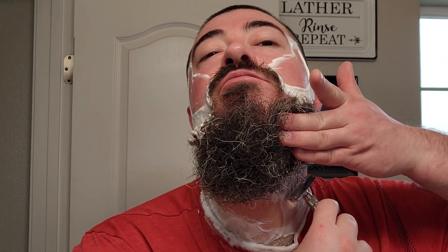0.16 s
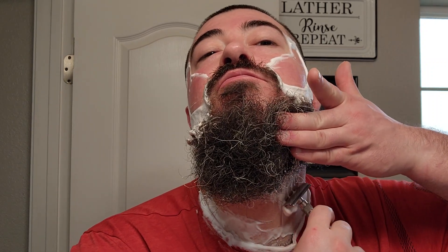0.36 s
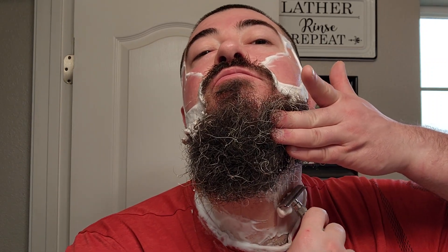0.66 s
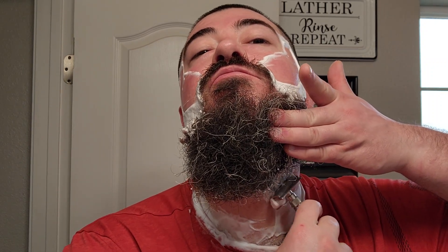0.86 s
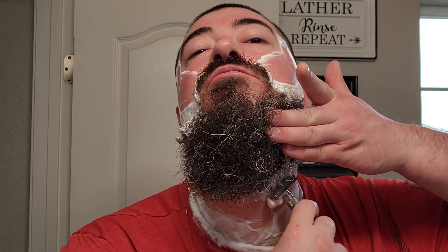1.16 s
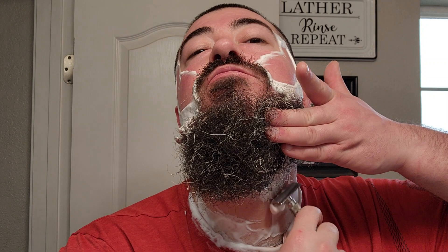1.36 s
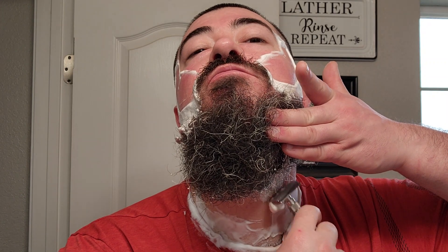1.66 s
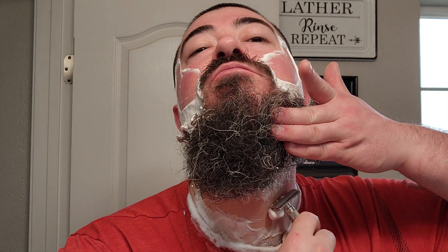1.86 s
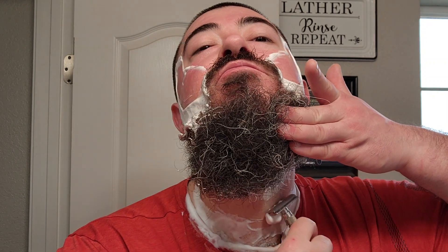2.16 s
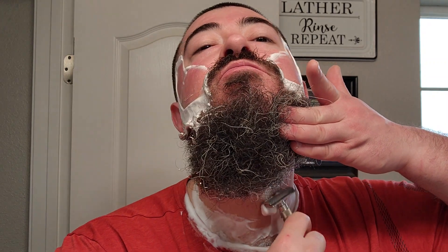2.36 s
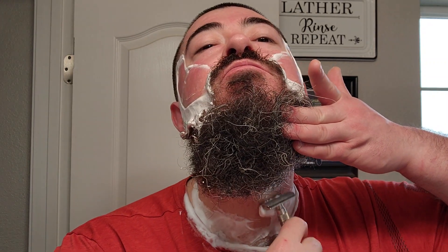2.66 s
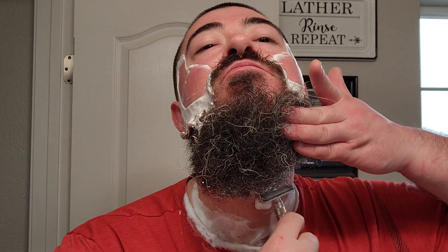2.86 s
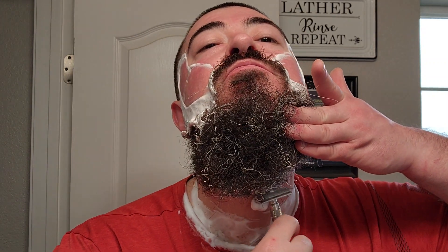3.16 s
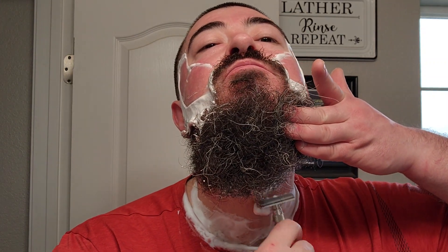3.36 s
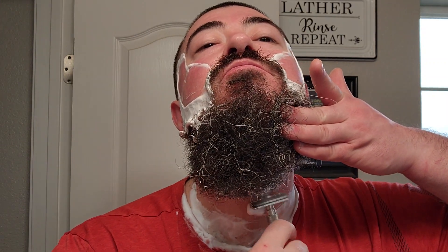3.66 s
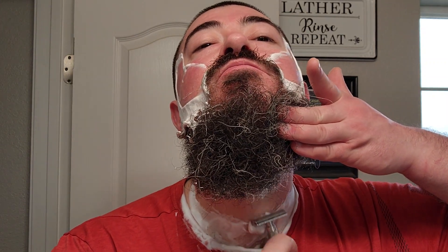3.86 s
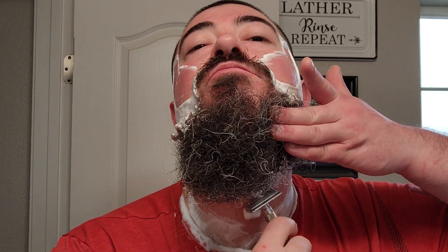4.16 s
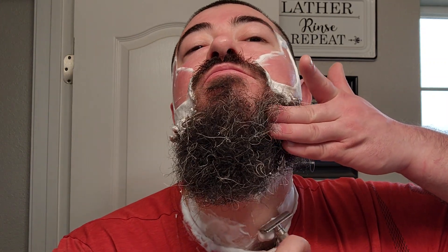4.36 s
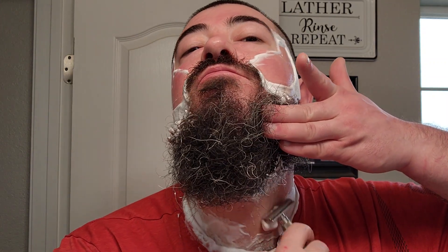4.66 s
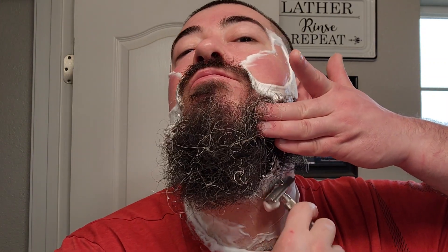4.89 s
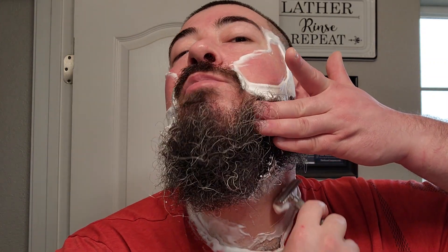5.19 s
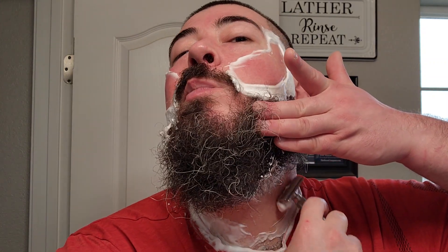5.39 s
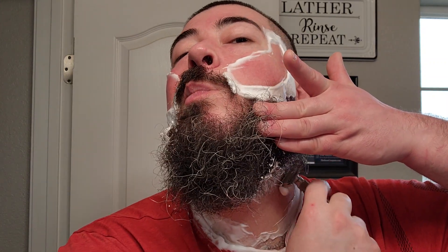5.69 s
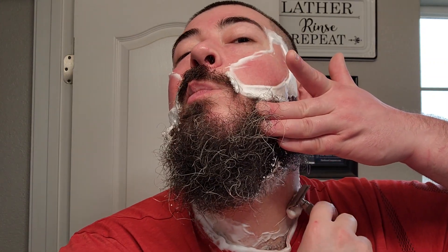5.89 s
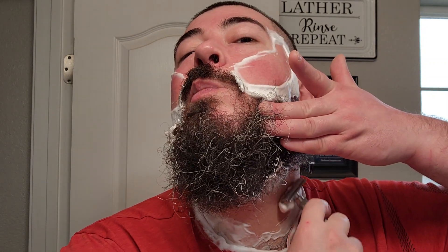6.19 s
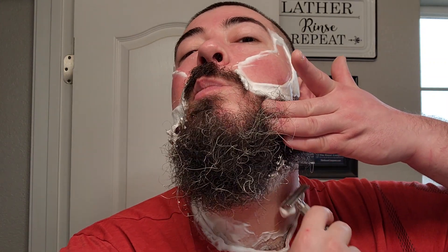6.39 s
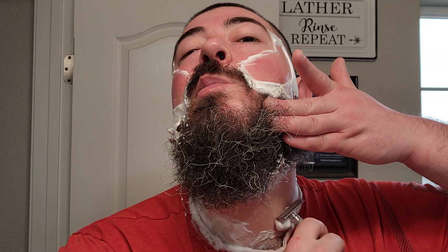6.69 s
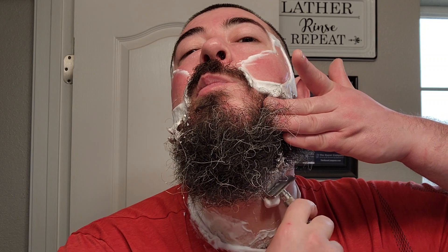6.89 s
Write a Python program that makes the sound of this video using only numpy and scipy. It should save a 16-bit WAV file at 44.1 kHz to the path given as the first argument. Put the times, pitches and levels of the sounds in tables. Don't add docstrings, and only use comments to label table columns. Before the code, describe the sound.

Close to a phone in a small tiled bathroom, a metal safety razor takes short, scratchy strokes through neck stubble and lather, about three per second. Each begins with a sudden bite and rasps for little more than a tenth of a second. Sharp hair snaps, faint blade ringing and fizzing bubbles stand out. A low fan hum, soft rumble and faint air hiss continue throughout.

```python
import sys
import numpy as np
from scipy import signal
from scipy.fft import rfft, irfft
from scipy.io import wavfile
from scipy.ndimage import uniform_filter1d

SR = 44100
rng = np.random.default_rng(int(sys.argv[2]) if len(sys.argv) > 2 else 0)


def master_out(mix):
    frames = np.transpose(np.atleast_2d(mix))
    ceiling = np.clip(frames, -1, 1)
    pcm = np.round(ceiling * 32767).astype(np.int16)
    wavfile.write(sys.argv[1], SR, pcm)


def invert_db(x):
    u = np.asarray(x, float) / 20
    return 10 ** u


N = 310464
BITE_RISE_S = 0.014

# freq_hz, width_hz, level_db
SKIN = [(1330, 260, -17), (2250, 360, -2.5), (2620, 250, -2.5), (3087, 470, -1)]
HEAD = [(3600, 890, -4.5), (4296, 490, -2), (4594, 570, -0.5), (5050, 330, -1), (5330, 660, -3.5)]
BLADE = [(6200, 540, -13), (7460, 700, 4), (7350, 570, -3.5), (8300, 1000, -6.5)]
FIZZ = [(9500, 5100, -6), (11930, 1400, -6), (15400, 2500, -4.5)]


def unit(x):
    return x / np.sqrt(np.mean(x ** 2))


def colour(x, points):
    hz, db = np.transpose(points)
    bins_hz = np.maximum(np.arange(N // 2 + 1) * SR / N, 1)
    gain_db = np.interp(np.log(bins_hz), np.log(hz), db)
    return irfft(rfft(x) * invert_db(gain_db), N)


def lag(x, samples):
    turns = np.arange(N // 2 + 1) / N * samples
    return irfft(rfft(x) * np.exp(-2j * np.pi * turns), N)


def ring(x, modes):
    out = 0
    for k, (hz, width_hz, db) in enumerate(modes):
        radius = np.exp(-np.pi * width_hz / SR)
        angle = 2 * np.pi * hz / SR
        b = [0, radius * np.sin(angle)]
        a = [1, -2 * radius * np.cos(angle), radius ** 2]
        out = out + (-1) ** k * invert_db(db) * np.sqrt(width_hz) * signal.lfilter(b, a, x)
    return out


def walk(rate_hz):
    hold = int(SR / rate_hz)
    steps = np.repeat(rng.standard_normal(N // hold + 1), hold)
    return unit(uniform_filter1d(uniform_filter1d(steps, hold), hold)[:N])


def clicks(per_s, spread_db):
    there = rng.random(N) < per_s / SR
    size = np.minimum(rng.exponential(size=N), 3.8)
    sign = rng.choice([-1., 1.], N)
    return there * sign * invert_db(spread_db * size)


def ticks(s, peak_db, modes):
    tick = np.zeros(N)
    tick[(s * SR).astype(int)] = invert_db(peak_db)
    rattle_s = 0.0012
    fading = signal.lfilter([0, 1], [1, -np.exp(-1 / (rattle_s * SR))], tick)
    tick = tick + 0.11 * fading * rng.standard_normal(N)
    peak = np.max(np.abs(ring(signal.unit_impulse(512), modes)))
    return ring(tick, modes) / peak


def air():
    # freq_hz, level_db
    rumble_points = [(12, -42), (20, -6), (54, -7), (102, -4), (123, -9.5), (146, -10), (167, -18),
                     (189, -26.5), (244, -18.5), (290, -31), (356, -26), (401, -35.5), (444, -30.5),
                     (574, -37.5), (1200, -60.5), (1560, -67), (2640, -120)]
    hiss_points = [(410, -28), (700, 1.5), (860, -9), (990, -6), (1440, -9), (1710, -10.5), (1970, -6),
                   (2530, -11), (3110, -8.5), (4150, -10.5), (4750, -6), (5500, -6.5), (6700, -12.5),
                   (7500, -7.5), (8300, -16.5), (8900, -29), (10000, -40.5), (15500, -30.5)]
    # freq_hz, width_hz, level_db
    booms = [(79.36, 3.2, -60.5), (154.8, 38, -64), (243.8, 3, -72.5), (335.8, 22, -74)]
    mid, side = (colour(rng.standard_normal(N), rumble_points) for _ in range(2))
    side = colour(side, [(30, -13.5), (120, -19.5), (300, -6.5), (700, -6.0), (1200, 2.0)])
    rumble_db, sway_db = -51, 0.6
    scale = invert_db(rumble_db + sway_db * walk(3.02)) / np.std(mid)
    mid, side = scale * mid, scale * side
    for hz, width_hz, db in booms:
        peak = [(hz - 3 * width_hz, -120), (hz - width_hz / 2, 0),
                (hz + width_hz / 2, 0), (hz + 3 * width_hz, -120)]
        boom = unit(colour(rng.standard_normal(N), peak))
        mid = mid + invert_db(db + 1.34 * walk(3.91)) * boom
    mid = colour(mid, [(95, 0.5), (110, -9), (135, -0.5)])
    hiss = np.array([unit(colour(rng.standard_normal(N), hiss_points)) for _ in range(2)])
    hiss_db = -73.5 + 0.5 * walk(2.2)
    return np.array([mid + side, lag(mid, 2.0) - side]) + hiss * invert_db(hiss_db)


def hum():
    # freq_hz, level_db (rms), unsteadiness_db, left_minus_right_db
    tones = [(98.3, -54.6, .6, .3), (120.0, -47.7, .25, .3), (240.1, -66.5, .9, .5),
             (360.0, -76.5, .9, 1.6), (436.1, -87, 1.4, 2.4), (960.3, -101, 1.5, -11)]
    late_samples = np.array([[0], [6.5]])
    t = (np.arange(N) - late_samples) / SR
    out = 0
    for hz, db, wobble_db, pan_db in tones:
        level = np.sqrt(2) * invert_db(db + wobble_db * walk(2.3))
        tone = level * np.sin(2 * np.pi * (hz * t + rng.random()))
        out = out + tone * invert_db(np.array([[pan_db], [-pan_db]]) / 2)
    return out


def bathroom(x, t60_s, wet_db):
    t = np.arange(int(.4 * SR)) / SR
    echoes = rng.standard_normal((2, len(t))) * invert_db(-60 * t / t60_s) * (t > .002)
    echoes = echoes / np.sqrt(np.sum(echoes ** 2, axis=1, keepdims=True))
    return invert_db(wet_db) * signal.fftconvolve(x[None], echoes, axes=1)[:, :N]


def singing():
    # start_s, length_s, pitch_hz, level_db (rms)
    notes_sung = [(0.123, 0.033, 2300, -76.5), (0.075, .07, 4310, -77), (0.395, 0.055, 4320, -76),
                  (0.426, 0.0378, 2230, -78), (1.567, 0.034, 2250, -73), (1.57, 0.03, 4640, -77),
                  (1.886, .04, 3000, -81), (2.752, 0.048, 5050, -88), (3.879, 0.047, 4770, -77),
                  (4.375, 0.042, 4560, -84), (4.756, 0.045, 3000, -76.5), (5.112, 0.052, 3036, -77),
                  (5.137, 0.03, 5330, -79.5), (6.325, 0.04, 2270, -77), (6.364, 0.044, 2270, -73),
                  (6.74, 0.048, 2236, -75.5)]
    out = np.zeros(N)
    for start_s, length_s, hz, db in notes_sung:
        tone = ring(rng.standard_normal(8192), [(hz, 30, 0)])[-int(length_s * SR):]
        tone = unit(tone * np.sqrt(np.hanning(len(tone))))
        first = int(start_s * SR)
        out[first:first + len(tone)] += invert_db(db) * tone
    return out


def snaps():
    # time_s, peak_db, low_part_db, blade_part_db
    hairs = [(0.0782, -47.5, -11, -29), (0.1074, -52, -16, -15), (0.1494, -53.5, -17, -6.5),
             (0.3702, -52.5, -13.5, -27), (0.386, -54, -15, -26), (0.4044, -46, -29, -26),
             (0.667, -53.5, -7.5, -22), (0.699, -52.5, -8, -16), (0.982, -56.5, -11, -15),
             (1.272, -50.5, -10, -27), (1.288, -46.5, -17, -24), (1.5815, -48, -16, -14),
             (1.5885, -50.5, -14, -11), (2.134, -50.5, -13, -21), (2.151, -46, -19, -17),
             (2.2226, -54.5, -11, -14), (2.4536, -42.5, -16, -27), (2.4636, -43.5, -15.5, -25),
             (3.5793, -53.5, -9, -15.5), (3.8975, -49, -14, -25), (3.954, -55, -5.5, -13.5),
             (4.3168, -53.5, -9, -16), (4.3645, -50.5, -10, -20), (4.3789, -53.5, -6, -11.5),
             (4.779, -60, -17, -16), (5.1286, -61, -14, -5), (5.2874, -57, -8, -15),
             (5.643, -52.5, -15, -14), (5.994, -52, -22, -23), (6.743, -50.5, -20, -17)]
    # time_s, peak_db
    pops = [(0.4564, -67), (0.724, -60), (1.0755, -66), (1.1068, -61), (1.383, -63), (1.6087, -62),
            (1.6267, -60.5), (1.71, -65), (1.8692, -65), (1.935, -67), (2.241, -62), (2.5329, -58),
            (2.795, -73), (3.385, -67), (3.7309, -75), (3.9539, -65), (4.0422, -65), (4.3645, -63),
            (4.38, -57.5), (4.76, -58), (4.7805, -62), (4.8683, -69), (5.1282, -63), (5.4854, -70),
            (6.855, -77), (0.0737, -69), (2.4526, -62), (3.8801, -66.5), (6.7435, -64)]
    s, peak_db, low_db, blade_db = np.transpose(hairs)
    out = ticks(s, peak_db + low_db + 1.5, SKIN)
    out = out + ticks(s, peak_db - 4.5, HEAD)
    out = out + ticks(s, peak_db + blade_db + 7.5, BLADE)
    s, peak_db = np.transpose(pops)
    return out + ticks(s, peak_db + 9.5, FIZZ)


def swell(s, length_s, peak_share, start_db, end_db):
    lift_s = 0.08
    peak_s = np.clip(peak_share, .02, .98) * length_s
    times_s = [-BITE_RISE_S, 0, peak_s, length_s, length_s + lift_s]
    db = np.interp(s, times_s, [-30, start_db, 0, end_db, -30])
    return invert_db(db) * (s > -BITE_RISE_S) * (s < length_s + lift_s)


def around(start_s):
    return slice(int((start_s - .05) * SR), int((start_s + .4) * SR))


def pressure():
    # start_s, length_s, bite_db, sweep_db, head_ring_db (above the skin)
    stroke_list = [(0.064, 0.12, -79, -74.5, 4.5), (0.377, 0.11, -77, -71.5, 4),
                   (0.668, 0.14, -79, -75, 2.5), (0.98, 0.1726, -84, -75, -2.5),
                   (1.272, 0.12, -81, -74.5, -1), (1.561, 0.112, -72, -75, -3),
                   (1.862, 0.13, -76.5, -74.5, -2), (2.132, 0.14, -76, -73.5, -3),
                   (2.445, 0.14, -67, -78, -3), (2.718, 0.13, -77, -73.5, -7), (3.009, 0.12, -84, -78, -11),
                   (3.3, 0.11, -74.5, -73, -6), (3.578, 0.108, -70.5, -75, -9),
                   (3.873, 0.25, -71, -73.5, -7), (4.358, 0.095, -80, -74.5, -4.5),
                   (4.727, 0.15, -74, -77.5, -5), (5.116, 0.098, -86, -71.5, -3.5),
                   (5.471, 0.15, -72.5, -73, -2), (5.846, 0.19, -74.5, -77.5, -3),
                   (6.274, 0.15, -84, -72, -3.5), (6.68, 0.13, -88, -73, -4.5)]
    # start_s, length_s, fizz_db, peak_share (of the length)
    lather = [(.072, 0.15, -84, .6), (0.421, 0.058, -72.5, 0.71), (0.717, 0.089, -71, .2),
              (1.005, .12, -76.5, 0.38), (1.288, 0.1, -77, 0.8), (1.573, 0.12, -79.5, 0.3),
              (1.865, 0.13, -76.5, 0.16), (2.16, .13, -77, .6), (2.447, .14, -77.5, 0.084),
              (2.748, 0.11, -85, .5), (3.04, .13, -90.5, .5), (3.31, 0.11, -88, .6), (3.58, .11, -84.5, .5),
              (3.882, 0.23, -81.5, 0.25), (4.3, 0.046, -82, .4), (4.355, 0.08, -73.5, .2),
              (4.75, 0.12, -76, .2), (5.118, 0.071, -73.5, .15), (5.48, .12, -81, .3),
              (5.85, .16, -87, .15), (6.268, .15, -85, 0.55), (6.696, 0.092, -82, 0.32)]
    bite_parts = invert_db([-0.5, -1, -5.5])
    bite_fade_db_per_s, sweep_blade_db = 149.5, -6.5
    foam_parts = invert_db([0.5, 0])
    t, power = np.arange(N) / SR, np.zeros((4, N))
    for start_s, length_s, bite_db, sweep_db, head_db in stroke_list:
        span = around(start_s)
        s = t[span] - start_s
        bite = np.clip(s / BITE_RISE_S, 0, 1) * invert_db(bite_db - bite_fade_db_per_s * s) * (s < length_s)
        sweep = invert_db(sweep_db) * swell(s, length_s, 0.48, -8.5, -11)
        power[:3, span] += np.outer(bite_parts, bite) ** 2
        power[:3, span] += np.outer(invert_db([0, head_db, sweep_blade_db]), sweep) ** 2
    for start_s, length_s, fizz_db, peak_share in lather:
        span = around(start_s)
        foam = invert_db(fizz_db) * swell(t[span] - start_s, length_s, peak_share, -8, -9)
        power[2:, span] += np.outer(foam_parts, foam) ** 2
    return np.sqrt(power)


def strokes():
    stubble = unit(clicks(600, 3.2) * invert_db(2.9 * walk(90)))
    parts = [(SKIN, 1265, 0.59), (HEAD, 1900, 0.63), (BLADE, 2680, 0.64), (FIZZ, 2650, 0.72)]
    out = 0
    for gain, (modes, own_per_s, shared) in zip(pressure(), parts):
        own = unit(clicks(own_per_s, 1.3) * invert_db(1.4 * walk(60)))
        out = out + gain * unit(ring(shared * stubble + (1 - shared) * own, modes))
    return out


def scene():
    # freq_hz, level_db
    reach = [(1000, -7), (1900, -0.5), (8200, 0), (9600, -3), (11500, -0.3)]
    # freq_hz, level_db
    far_port = [(200, -1), (700, -5.5), (2500, -6.5), (4000, -3), (5400, -5.5), (6000, -15.5), (7200, -9.5),
                (8500, -17), (10000, -5.5), (15000, -11.5)]
    razor = invert_db(7.0) * colour(strokes() + snaps() + singing(), reach)
    direct = np.array([invert_db(-3.0) * razor, invert_db(-3.5) * lag(razor, 6.97)])
    early = bathroom(razor, 0.097, np.array([[-5.5], [-2.5]]))
    tail = bathroom(razor, 0.3, -17.5)
    near, far = direct + early + tail + air()
    return np.array([near, colour(far, far_port)]) + hum()


def band_limit(x):
    return signal.sosfilt(signal.butter(12, 16250, fs=SR, output="sos"), x)


def record(dry):
    self_noise_db, top_hz = -95, 15760
    capsules = dry + invert_db(self_noise_db) * rng.standard_normal(dry.shape)
    top_cut = signal.ellip(7, .1, 40, top_hz, fs=SR, output="sos")
    return band_limit(signal.sosfiltfilt(top_cut, capsules))


dry = scene()
out = record(dry)
master_out(out)
```